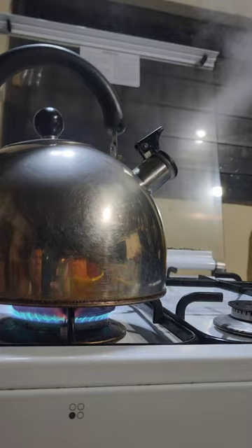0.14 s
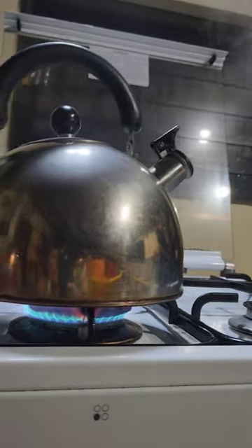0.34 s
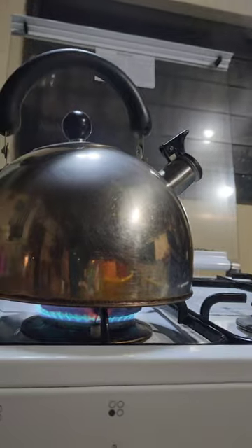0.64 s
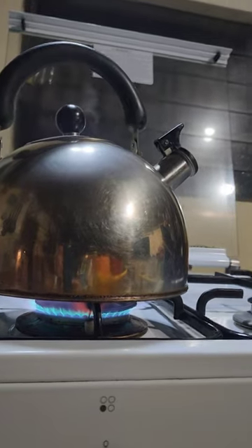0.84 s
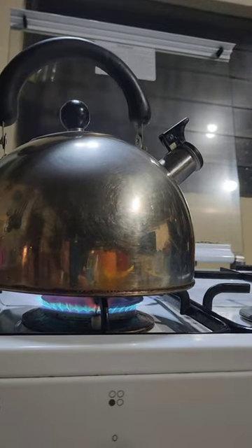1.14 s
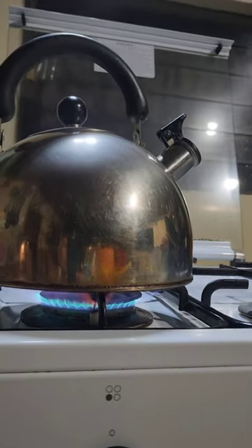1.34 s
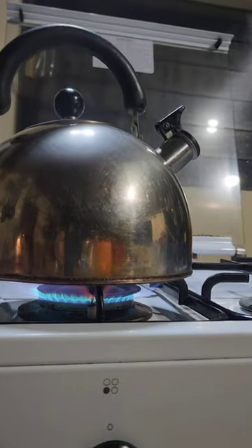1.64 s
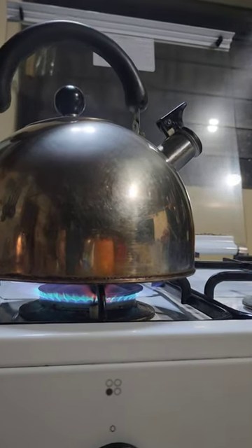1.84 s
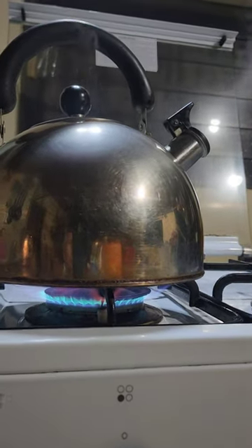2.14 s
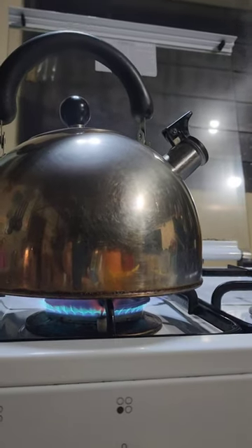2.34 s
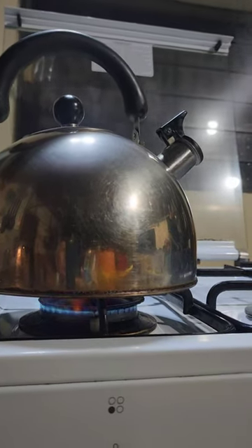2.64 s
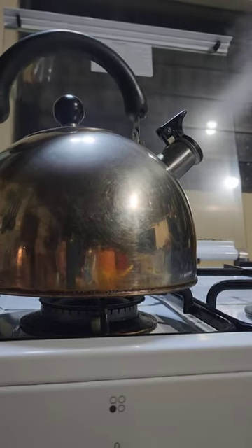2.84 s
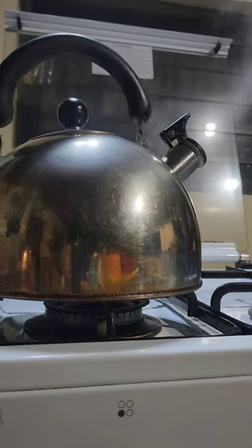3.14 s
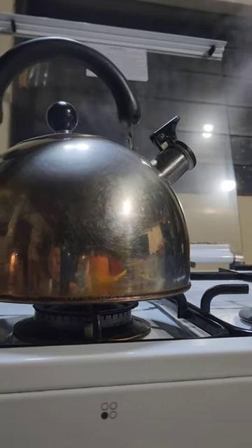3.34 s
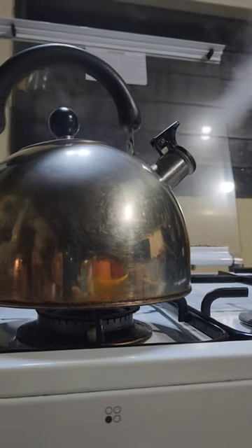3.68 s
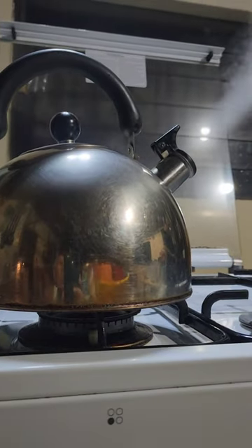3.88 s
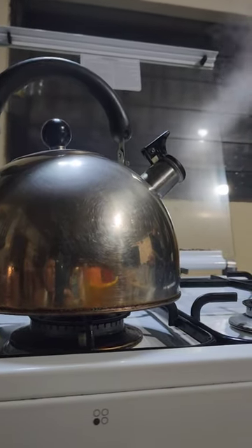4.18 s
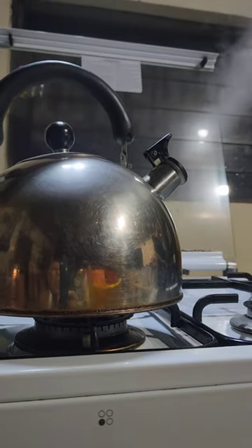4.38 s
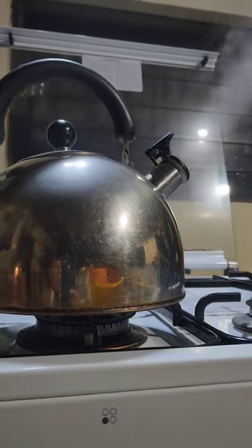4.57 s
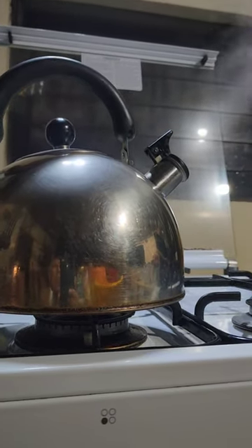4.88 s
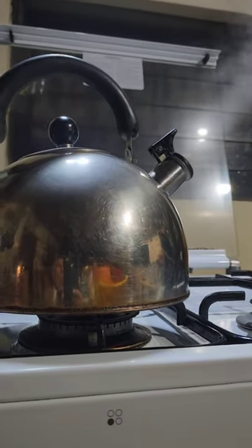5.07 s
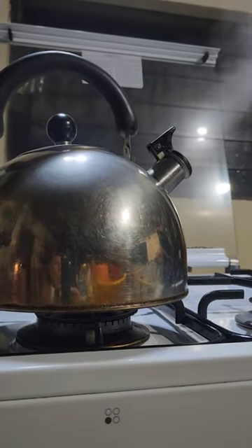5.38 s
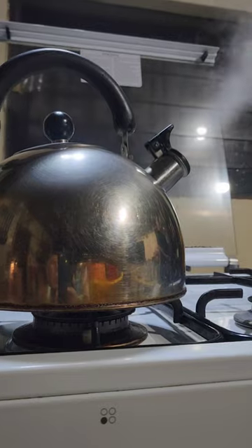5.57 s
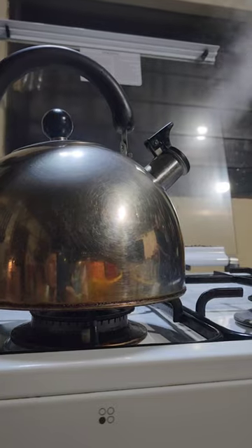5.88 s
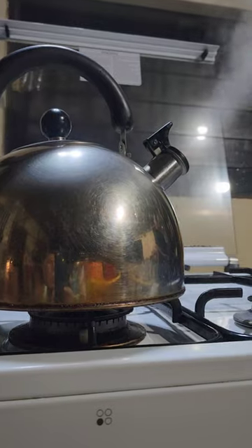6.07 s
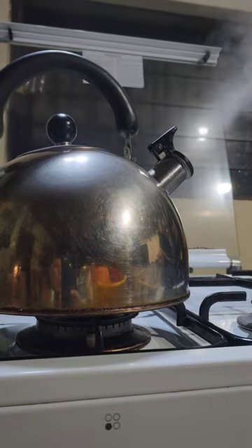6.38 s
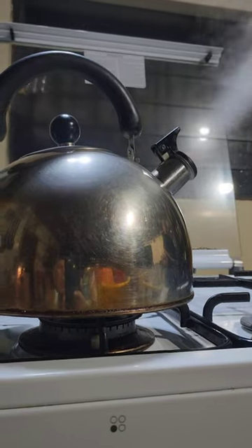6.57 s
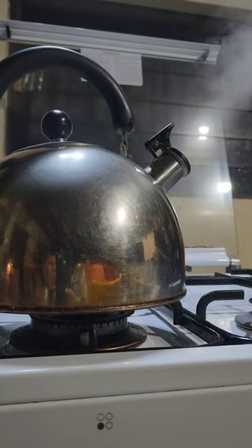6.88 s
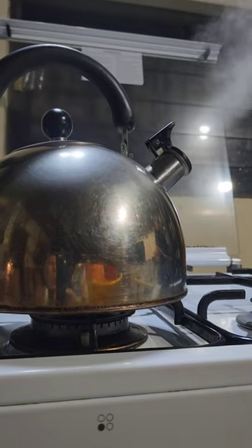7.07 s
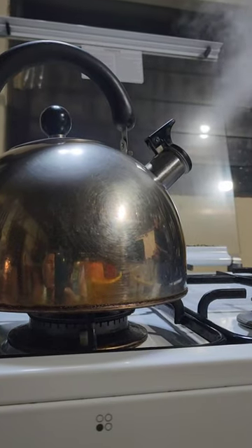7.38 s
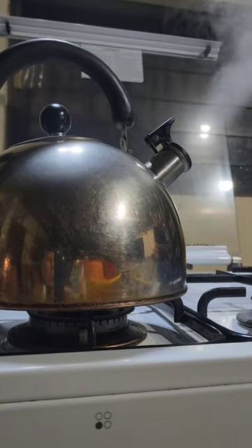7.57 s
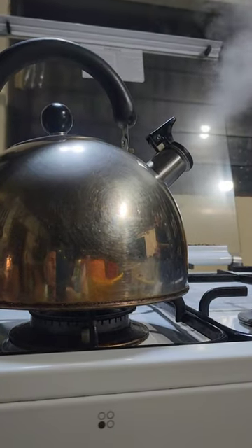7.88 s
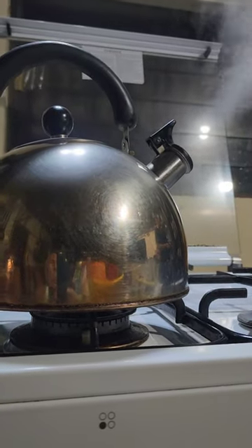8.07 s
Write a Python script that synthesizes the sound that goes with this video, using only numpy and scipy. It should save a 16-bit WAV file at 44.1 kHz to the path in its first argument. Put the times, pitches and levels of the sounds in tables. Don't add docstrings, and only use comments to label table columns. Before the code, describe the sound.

A steel kettle whistles shrilly and steadily on a gas stove, then slides down in pitch as the flame dies, jumping up at the very end.

```python
import sys
import numpy as np
from scipy import signal
from scipy.io import wavfile
from scipy.ndimage import uniform_filter1d

SR = 44100
rng = np.random.default_rng(int(sys.argv[2]) if len(sys.argv) > 2 else 0)


def digitize_waveform(pressure):
    field = np.atleast_2d(pressure).T
    bounded = np.clip(field, -1, 1)
    quanta = np.round(bounded * 32767).astype(np.int16)
    wavfile.write(sys.argv[1], SR, quanta)


def magnitude_from_level(level_db):
    exponent = np.asarray(level_db, float) / 20
    return 10 ** exponent


N = 362502
PORT_LAG = 8
EDGE_HZ = 15730


def evened(x):
    return x / np.sqrt(np.mean(abs(x) ** 2) + 1e-20)


def read(points, hz):
    f, value = np.transpose(points)
    return np.interp(np.log(hz + 1), np.log(f + 1), value)


def play(rows, t):
    s, *columns = np.transpose(rows)
    return [np.interp(t, s, c) for c in columns]


def humps(rows, t):
    return sum(height * np.exp(-abs((t - s) / half) ** 3) for s, half, height in rows)


def ramp(t, start, length):
    return np.clip((t - start) / length, 0, 1)


def spin(hz):
    return np.exp(2j * np.pi * np.cumsum(hz) / SR)


def fuzz(width, size=N):
    z = rng.standard_normal(size) + 1j * rng.standard_normal(size)
    r = np.exp(-np.pi * width / SR)
    return evened(signal.lfilter([1], np.convolve([1, -r], [1, -r]), z))


# time in seconds, pitch in Hz.
PITCH = [(0.0, 6130), (1.2, 6124), (1.55, 6103), (2.78, 6116), (3.0, 6032), (3.375, 5759), (3.875, 5516),
         (4.375, 5222), (5.125, 4869), (5.875, 4565), (6.625, 4240), (7.125, 3992), (7.375, 3900),
         (7.625, 3762), (7.875, 3632), (8.0, 3578), (8.14, 3495), (8.22, 3485)]
# time in seconds, level in dB, left minus right in dB.
WHISTLE = [(0.0, -16.5, 3.5), (0.5, -14.5, 3.5), (1.0, -14.5, 5), (1.5, -16, 6), (2.0, -15, 5),
           (2.35, -12.5, 4), (2.62, -17.5, 4.5), (3.0, -12.5, 2.5), (3.5, -12.5, 0), (4.1, -14, 0.5),
           (4.7, -15, -2.5), (5.3, -16.5, -1.5), (5.9, -16.5, -4.5), (6.5, -18, -2), (7.0, -19.5, -1.5),
           (7.5, -20.5, 1), (7.85, -22.5, -0.5), (8.09, -24, -1.5)]
# tone pitch in Hz, centre in Hz, width in Hz, level in dB,
# level of its sum tone under it in dB.
RIVAL = [(3440, 5500, 460, -24, -8), (3620, 5750, 700, -33, -26), (4330, 6420, 450, -36.5, -8),
         (4920, 6750, 1300, -65, -6), (5640, 7250, 540, -50, 3), (6088, 7550, 440, -34.5, -0.5)]
PARTIALS_DB = [1, -4, -13]
# frequency in Hz, gain in dB.
SPOUT = [(7000, -2.5), (8000, -6), (8800, -4), (9600, -11), (11200, -19.5), (13500, -16.5), (14700, -12),
         (15700, -24)]
# middle in seconds, half length in seconds, depth in dB.
LULLS = [
    (3.9, 0.56, 1),
    (5.3, 0.16, 3),
    (7.8, 0.16, 4.5),
    (7.93, 0.11, 8.5),
    (8.22, 0.087, 12),
]
FULL_HZ, SLACK_HZ = 6120, 3500
WANDER_FULL_HZ, WANDER_SLACK_HZ, WANDER_POWER = 27.8, 6.8, 5.2
DRIFT_FULL_HZ = 9
SKIRT_FULL_DB, SKIRT_CALM_DB, SKIRT_SLACK_DB = -14.5, -23.5, -17
FLUTTER_FULL_DB, FLUTTER_SLACK_DB = 2.5, -0.17
DYING_DB_PER_S, DYING_LEAD_S = 500, .035


def whistle(t):
    hz = play(PITCH, t)[0]
    push = np.clip((hz - SLACK_HZ) / (FULL_HZ - SLACK_HZ), 0, 1)
    surge = push ** WANDER_POWER

    wander = WANDER_SLACK_HZ + (WANDER_FULL_HZ - WANDER_SLACK_HZ) * surge
    quick = fuzz(125).real
    slow = uniform_filter1d(quick, 5000)
    turn = spin(hz + wander * evened(quick - slow) + DRIFT_FULL_HZ * surge * evened(slow))

    skirt_db = (SKIRT_CALM_DB + (SKIRT_FULL_DB - SKIRT_CALM_DB) * push ** 4.4
                + (SKIRT_SLACK_DB - SKIRT_CALM_DB) * (1 - push) ** 2.6)
    below = fuzz(810) * spin(np.full(len(t), -250.))
    skirt = magnitude_from_level(skirt_db) * (below + .5 * fuzz(660))

    tone = turn * (1 + skirt)
    for k, under_db in enumerate(PARTIALS_DB, 2):
        level = magnitude_from_level(under_db + read(SPOUT, k * hz))
        tone += level * turn ** k * (1 + 1.6 * skirt) * (k * hz < EDGE_HZ)

    flutter_db = FLUTTER_SLACK_DB + (FLUTTER_FULL_DB - FLUTTER_SLACK_DB) * surge
    dying_db = DYING_DB_PER_S * np.maximum(t - LOCKED[1][0] + DYING_LEAD_S, 0)
    db = play(WHISTLE, t)[0] - dying_db + flutter_db * evened(fuzz(75).real)

    rival_hz, width, rival_db, sum_db = play(RIVAL, hz)
    wide = np.clip((width - 400) / 300, 0, 1)
    rival = magnitude_from_level(rival_db - humps(LULLS, t)) * spin(rival_hz) * ((1 - wide) * fuzz(450) + wide * fuzz(900))
    rival = rival * (1 + magnitude_from_level(sum_db) * turn)
    return np.sqrt(2) * (magnitude_from_level(db) * tone + rival).real


def room(x, t60, wet_db):
    taps = np.zeros((2, 30000))
    at = np.arange(120, 29960, 20) + rng.integers(0, 20, (2, 1492))
    np.put_along_axis(taps, at, rng.choice([-1., 1.], at.shape), 1)
    taps *= magnitude_from_level(-60 * np.arange(30000) / SR / t60)
    taps *= magnitude_from_level(wet_db) / np.linalg.norm(taps[0])
    taps[[0, 1], [0, PORT_LAG]] = 1
    return signal.fftconvolve(x[None], taps / np.linalg.norm(taps[0]), axes=1)[:, :N]


# frequency in Hz, level in dB.
HOT = [(900, -25), (1300, -13), (1800, -10.5), (2700, -13.5), (3500, -8), (4800, -4.5), (6500, 8.5),
       (8500, 0.5), (10500, 0.5), (11500, 1), (13000, 8.5), (14300, -7), (15500, 2)]
# frequency in Hz, level in dB.
COOL = [(900, -91), (2000, -15), (2700, -23), (3500, -9.5), (4300, -7), (5600, 2), (6800, -3), (8500, 2),
        (9800, -4), (11000, -12.5), (12000, -10), (13500, -7.5), (15000, -16), (15800, -2)]
# middle in seconds, half length in seconds, added force (0-1).
SPURTS = [
    (3.2, .3, 0.23),
    (5.75, .35, 0.27),
]
HISS_FULL_DB, HISS_SLACK_DB = -28, -29
COOL_HZ, HOT_HZ, COOL_FORCE = 4900, 6550, 0.033


def hiss_spectrum(t, hz):
    flutter = evened(uniform_filter1d(rng.standard_normal(len(t)), 2))
    force = np.clip((play(PITCH, t)[0] - COOL_HZ) / (HOT_HZ - COOL_HZ), COOL_FORCE, 1)
    force = np.minimum(force + humps(SPURTS, t), 1)
    level_db = HISS_SLACK_DB + (HISS_FULL_DB - HISS_SLACK_DB) * force - humps(LULLS, t)
    colour_db = force * read(HOT, hz) + (1 - force) * read(COOL, hz)
    return magnitude_from_level(level_db + colour_db + 0.59 * flutter - 44)


# frequency in Hz, level in dB per Hz.
KITCHEN = [(12, -37), (20, -0.5), (85, -2.5), (117, -3), (150, -10), (323, -17), (549, -13.5), (709, -16),
           (771, -13.5), (954, -13.5), (1180, -13), (1960, -13), (3200, -4), (4160, -56), (7040, -120)]
# middle in seconds, half length in seconds, gain in dB.
TRAFFIC = [
    (.6, .2, 0),
    (3.25, 0.21, 8),
    (5.5, 0.79, 3.5),
]
FLAME_OUT_S, COOLING_S = 3.1, 0.6
SEETHE_DB, SEETHE_LOSS_DB, RUMBLE_DB, RUMBLE_LOSS_DB, DEEP_DB = -49, 3, -51.5, 4.5, -63
SIMMER_S, SIMMER_RISE_S, SIMMER_DB = 5.65, 0.44, 2.5
RUMBLE_FADE_S, RUMBLE_FADE_DB = 5.9, 4
GUST_DB = 5


def kitchen_spectrum(t, hz):
    cooled = ramp(t, FLAME_OUT_S, COOLING_S)
    gusts = GUST_DB * evened(uniform_filter1d(rng.standard_normal((len(t), 2)), 14, 0)).T
    seethe_db = SEETHE_DB - SEETHE_LOSS_DB * cooled + SIMMER_DB * ramp(t, SIMMER_S, SIMMER_RISE_S)
    rumble_db = RUMBLE_DB - RUMBLE_LOSS_DB * cooled + gusts[0]
    rumble_db = rumble_db - RUMBLE_FADE_DB * ramp(t, RUMBLE_FADE_S, 1.9)
    deep_db = DEEP_DB + humps(TRAFFIC, t) + gusts[1]
    low, deep = 1 / (1 + (hz / 220) ** 4), 1 / (1 + (hz / 55) ** 4)
    low_db = (low - deep) * (rumble_db - seethe_db + 2) + deep * (deep_db - seethe_db + 6)
    return magnitude_from_level(read(KITCHEN, hz) + seethe_db + low_db - 20) / (1 + (hz / 2600) ** 8)


# frequency in Hz, likeness (0-1).
SAME = [(60, .997), (130, .99), (290, .8), (640, .5), (1400, .5), (4000, .55), (16000, .5)]


def noises():
    frames, hz = N // 512 + 5, np.fft.rfftfreq(2048, 1 / SR)[:, None]
    t = np.arange(frames) * 512 / SR
    a, b, c, d, patches = rng.standard_normal((frames, 1025, 5)).T
    patches = evened(uniform_filter1d(uniform_filter1d(patches, 24, 0), 6, 1))

    same, left = np.clip(read(SAME, hz), -1, 1), a + 1j * b
    right = same * left + np.sqrt(1 - same ** 2) * (c + 1j * d)
    late = np.exp(-2j * np.pi * hz * PORT_LAG / SR * (hz > 400))
    z = np.array([left, late * right])

    standing = evened(uniform_filter1d(rng.standard_normal((2, 1025, 1)), 2, axis=1))
    z *= magnitude_from_level(5.14 * standing * hz ** 2 / (hz ** 2 + 400 ** 2))
    z *= np.hypot(hiss_spectrum(t, hz), kitchen_spectrum(t, hz)) * magnitude_from_level(1.05 * patches + 16)
    return signal.istft(z, nperseg=2048, noverlap=1536)[1][:, :N]


# start in seconds, level in dB, centre in Hz, width in Hz, length in seconds.
BUMPS = [(0.083, -39, 88, 60, 0.098), (0.9, -36, 250, 320, 0.093), (0.929, -35, 205, 200, 0.069),
         (0.935, -49, 92.5, 50, 0.059), (1.877, -43, 111, 60, 0.039), (2.114, -47, 398, 120, 0.044),
         (0.04, -59, 76, 70, 0.12), (2.428, -43, 111.3, 60, 0.11), (2.433, -46.5, 353, 600, 0.087),
         (5.257, -39.5, 271, 298, 0.061), (5.373, -48, 318, 150, 0.03), (6.244, -50, 248, 200, 0.055)]


def bumps():
    out = np.zeros((2, N))
    t = np.arange(8000) / SR
    for s, db, hz, width, length in BUMPS:
        shape = np.clip(t / 0.0097, 0, 1) * np.exp(-(t / length) ** 3)
        shared = fuzz(width, size=8000)
        apart = (hz / 500) ** 2 * fuzz(width, size=8000)
        rub = np.array([1.15 * shared + apart, shared - apart]) * spin(np.full(len(t), hz))
        at = round(s * SR)
        out[:, at:at + 8000] += magnitude_from_level(db) * shape * rub.real
    return out


# time in seconds, pitch in Hz, level in dB.
ENGINE = [
    (2.55, 108.6, -58),
    (2.65, 127.2, -52),
    (3.07, 116.4, -57),
    (3.99, 114, -50.5),
    (4.17, 121.4, -61),
    (4.28, 125.8, -56),
    (4.56, 128, -54.5),
    (4.65, 117, -80),
]


def engine(t):
    hz, db = play(ENGINE, t)
    on = np.clip(np.minimum(t - ENGINE[0][0], ENGINE[-1][0] - t) / .05, 0, 1)
    return np.sqrt(2) * on * magnitude_from_level(db) * (spin(hz) * (1 + 0.22 * fuzz(9.0))).real


# time in seconds, pitch in Hz, level in dB.
LOCKED = [
    (8.13, 5640, -52),
    (8.135, 5600, -23),
    (8.141, 5135, -12),
    (8.16, 5152, -12),
    (8.19, 5143, -10),
    (8.22, 5130, -12),
]


def takeover(t):
    hz, db = play(LOCKED, t)
    half = spin(hz / 2 + 2.8 * fuzz(60).real)
    tone = half ** 2 * (1 + .18 * fuzz(150)) + magnitude_from_level(-25) * half + magnitude_from_level(-29) * half ** 4
    return np.sqrt(2) * magnitude_from_level(db) * tone.real * (t > LOCKED[0][0])


def scene():
    t = np.arange(N) / SR
    pan_db = play(WHISTLE, t)[1]
    kettle = room(whistle(t) + takeover(t), t60=0.36, wet_db=-.3)
    kettle *= magnitude_from_level([pan_db / 2, -pan_db / 2])
    return kettle + noises() + bumps() + engine(t)


def band_limit(x):
    return signal.sosfilt(signal.butter(12, 16290, fs=SR, output="sos"), x)


def record(dry):
    low_pass = signal.firwin(1023, EDGE_HZ, window=("kaiser", 8), fs=SR)
    mix = signal.oaconvolve(dry, low_pass[None], "same")
    return band_limit(mix)


dry = scene()
out = record(dry)
digitize_waveform(out)
```